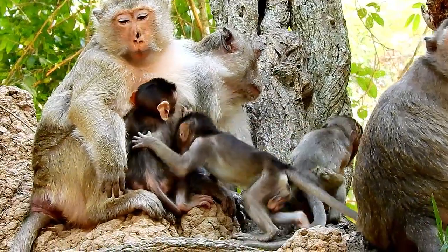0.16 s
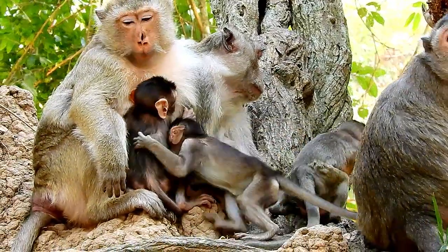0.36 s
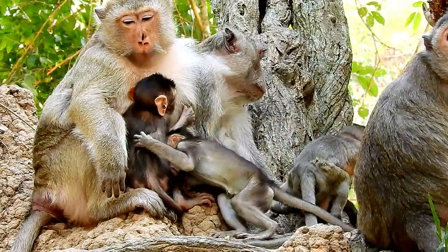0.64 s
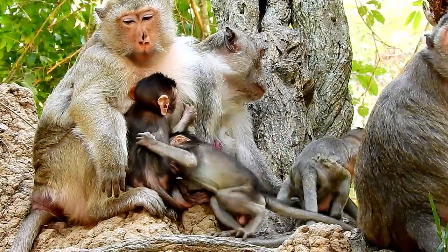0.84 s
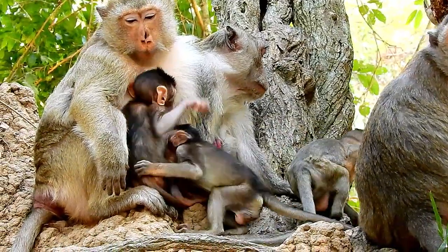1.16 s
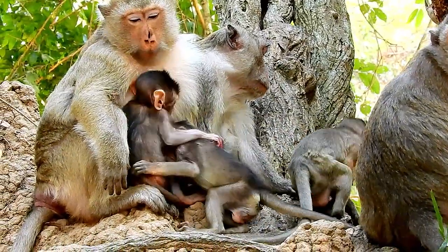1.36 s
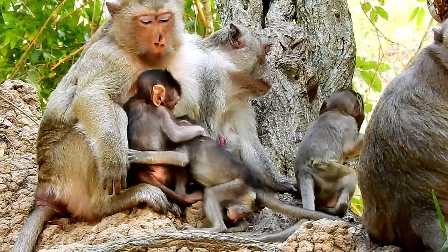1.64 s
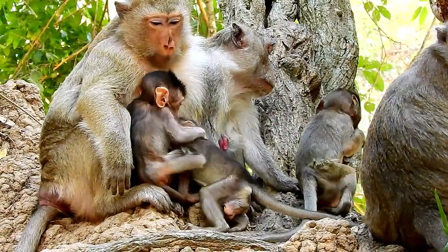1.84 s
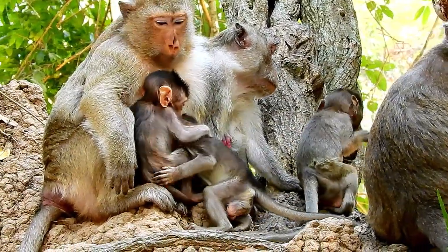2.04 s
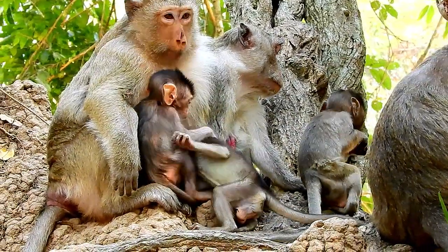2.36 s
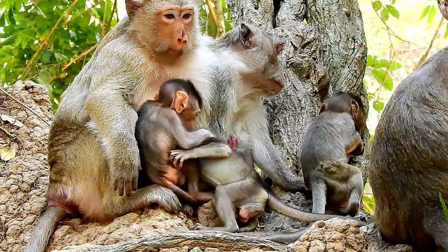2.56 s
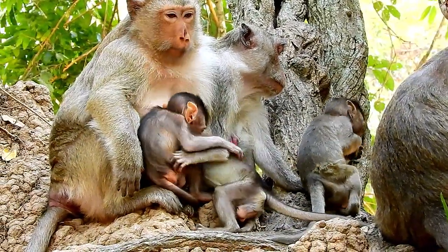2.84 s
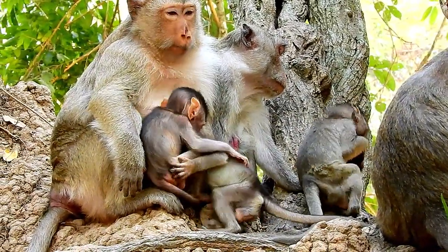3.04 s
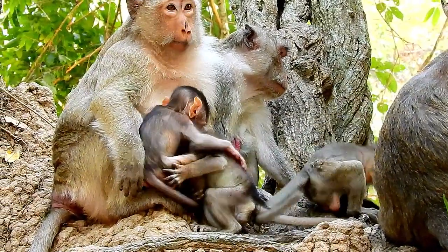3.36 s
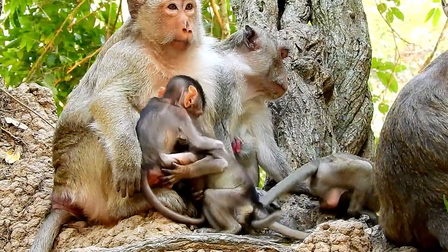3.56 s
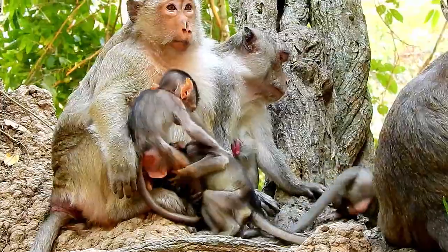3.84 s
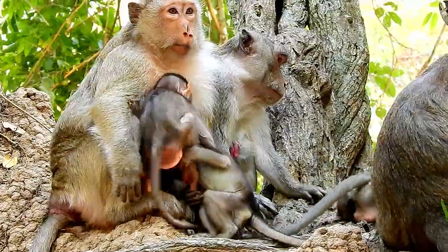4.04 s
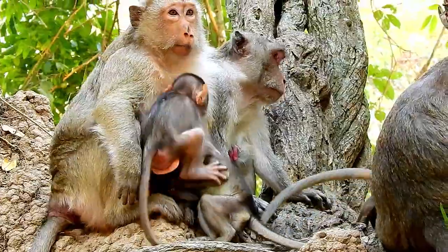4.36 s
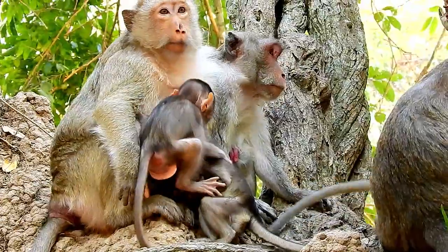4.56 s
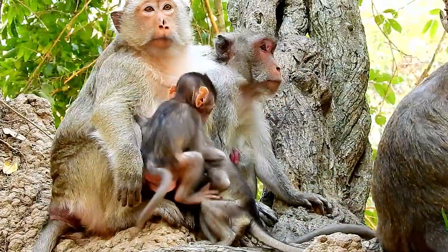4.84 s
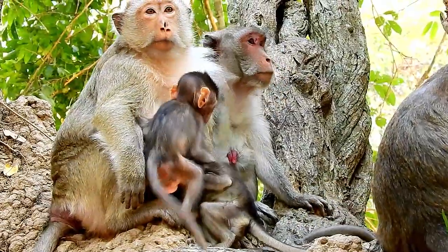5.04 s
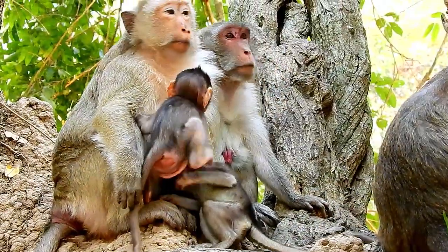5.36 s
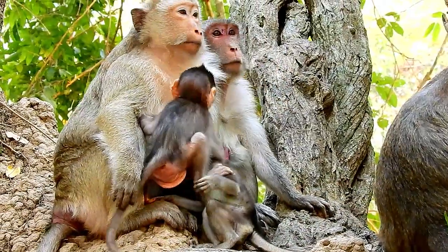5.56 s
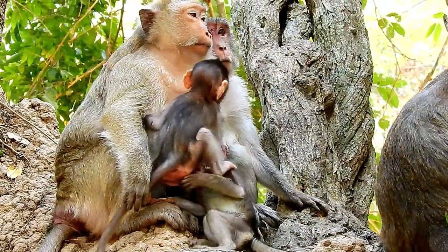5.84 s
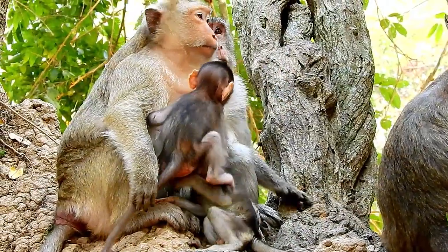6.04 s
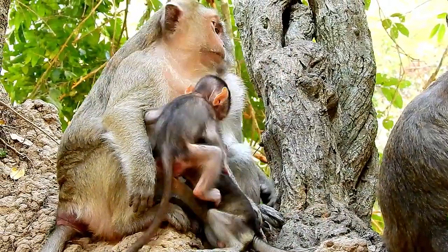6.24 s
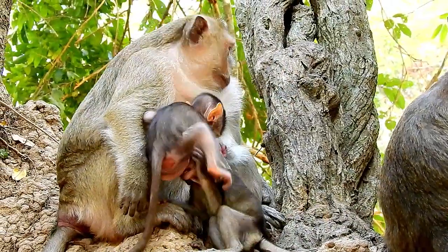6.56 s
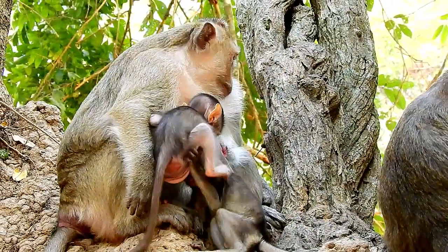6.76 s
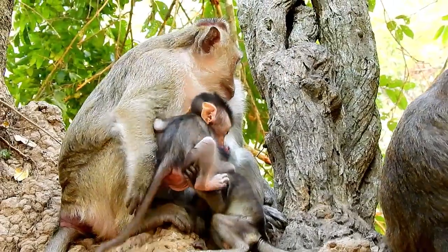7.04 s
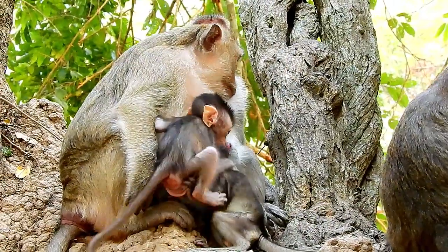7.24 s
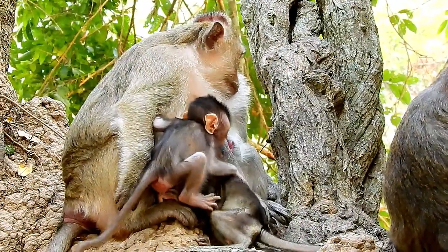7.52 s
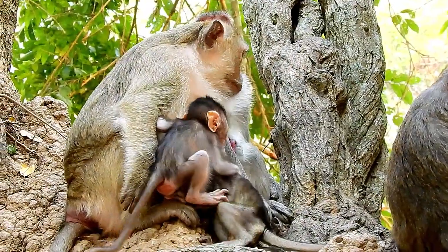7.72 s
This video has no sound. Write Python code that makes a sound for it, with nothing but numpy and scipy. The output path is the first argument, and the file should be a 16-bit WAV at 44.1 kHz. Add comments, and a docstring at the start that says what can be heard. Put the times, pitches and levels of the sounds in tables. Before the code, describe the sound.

Insects chirr steadily in the trees while a breeze rustles leaves, then a small motorbike passes right to left on gritty ground; a thin squeal follows.

```python
"""Insects chirr in the trees around a group of macaques: two fluttering bands of noise.
A slow breeze rustles the leaves (soft noise), with brushes (short swishes); a faint call sounds far off.
A small motorbike passes from right to left: harmonics and puffs of its firings for the exhaust,
roar and hiss noise swept by resonances and an echo, over a plain low rumble, and bursts for stones.
A thin squeal, a wavering sine with a hoarse edge, comes at the end, over a faint outdoor floor."""
import sys
import numpy as np
from scipy import signal
from scipy.fft import rfft, irfft
from scipy.io import wavfile

SR = 44100
rng = np.random.default_rng(int(sys.argv[2]) if len(sys.argv) > 2 else 0)


def transcribe(u):
    """Save the signal u as a 16-bit wav file named by the first command-line argument.

    u: samples, shape (n,) or (channels, n), limited to [-1, 1]; the rate is SR.
    q: integer samples, one column per channel.
    """
    v = np.clip(np.atleast_2d(u).T, -1, 1)
    q = np.round(v * 32767).astype(np.int16)
    wavfile.write(sys.argv[1], SR, q)


N = 347949
NFFT, HOP = 1024, 256
TIME = np.arange(N) / SR
BINS_HZ = np.fft.rfftfreq(NFFT, 1 / SR)
F_HZ = BINS_HZ[:, None]
FRAMES_S = np.arange(N // HOP + 5) * HOP / SR

# Spectra [f/Hz, relative density/dB per Hz]; noise() sets the level
# lower and higher singers
LOW_CHIRR_TONE = [(4700, -53), (5150, -27.5), (5500, -15.5), (5850, -3.5), (6250, 2), (6650, 1.5),
                  (7000, -4), (7500, -26), (8500, -58)]
HIGH_CHIRR_TONE = [(5500, -39.5), (6500, -5), (7050, 1.5), (7650, -0.5), (8150, -7), (8700, -13.5),
                   (9300, -33), (15500, -49)]
# still air and distant traffic
AIR_TONE = [(30, -16), (60, -12), (140, 3.5), (280, -7), (410, -1.5), (480, -19.5), (630, -1.5),
            (860, -13.5), (1250, -8), (2500, -9.5), (3800, -29), (9000, -55)]
# three parts of the rolling sound
RUMBLE_TONE = [(30, -43), (60, -21), (130, 3), (280, -4.5), (360, -6), (450, 0.5), (530, -3.5), (650, 4.5),
               (830, -3), (1000, 2.5), (1250, 0), (2000, -54)]
ROAR_TONE = [(600, -20.5), (880, -19), (1100, -3.5), (1340, -3), (1700, -4), (1920, -2.5), (2250, -2),
             (2750, -13.5), (3600, -72)]
HISS_TONE = [(1700, -9.5), (2800, -2.5), (3200, -2), (3600, 1.5), (3950, -3.5), (4350, 3.5), (5300, 1),
             (6800, -0.5), (8000, -10), (9200, -17), (11000, -21), (15500, -51)]

# likeness of two close microphones in sound from all around [f/Hz, likeness/0-1]
LIKENESS = [(300, 1), (550, 0.99), (1000, 0.89), (2000, 0.72), (4000, 0.75), (6500, 0.12), (9000, 0)]

# chorus swells, before band trims [t/s, lower singers/dB, higher singers/dB, left minus right/dB]
CHORUS_SWELLS = [(0, -53, -55.0, -2), (0.22, -50, -56.5, 2), (0.33, -54, -58.5, 0.5), (0.48, -49.5, -55, 0),
                 (0.66, -51.5, -59, -1), (1.08, -50, -55.5, 0), (1.5, -55.5, -53.5, 0.5),
                 (1.86, -50.5, -56, 0), (2.22, -48, -57, 0.5), (2.38, -54, -56.0, -0.5),
                 (3.24, -52.0, -55.5, 0.5), (4.09, -54, -56.5, 0.5), (4.2, -50, -56, 0.5),
                 (4.9, -51.5, -55, -0.5), (5.15, -52, -54.5, 1.5), (5.65, -49.5, -56.0, -0.5),
                 (6.9, -51.5, -57, 2), (7.6, -50, -57.5, -0.5), (7.88, -55.5, -57, 0.5)]
# phase by which the left microphone leads in the chorus [f/Hz, lead/rad]
CHORUS_LEAD = [(4570, 0.59), (5510, 0.62), (8440, 2.18)]
# flares of the chorus, before the rise and decay [t/s, extra level/dB]
FLARES = [(2.761, 4.5), (3.47, 2.5), (7.531, 3), (7.697, 5.5)]
FLARE_RISE_S, FLARE_DECAY_S = 0.0027, 0.033

RUSTLE_PEAK_S, RUSTLE_SPAN_S = 2.84, 2  # the rustle is strongest around here
CALL_START_S, CALL_LENGTH_S, CALL_HZ, CALL_DB = 1.07, 0.26, 1235, -77.5
# brushes through dry leaves, level before the envelope
# [t/s, level/dB, rise/s, decay/s, centre f/Hz, width/octaves]
BRUSHES = [(1.135, -67.5, 0.021, 0.045, 1560, 0.6), (2.105, -59, 0.0094, 0.1, 6270, 0.54),
           (3.0, -64.5, 0.053, 0.15, 2090, 0.69)]
# swells of the deeper singer [middle t/s, half length/s, level/dB]
DEEP_SWELLS = [(2.272, 0.42, -66.5), (4.4, 0.63, -64.5), (7.162, 0.07, -64)]
DEEP_HZ, DEEP_HALF_WIDTH_HZ = 5500, 480

# engine [t/s, firing rate/Hz]
FIRING = [(0, 29.84), (4.9, 29.25), (6.1, 28.57), (6.7, 27.95), (7.9, 27.5)]
# exhaust partials, before their wavering [multiple of firing rate, relative level/dB]
EXHAUST_NOTE = [(2, -8.5), (4, -10), (5, -1), (6, 3), (7, -7), (8, -13), (10, -6.5), (11, -12.5)]
# straight line at even speed
PASS_S, NEAREST_M, SPEED_M_PER_S = 6.15, 1.893, 8.86
# the pipe points backwards: its swell is later and broader
EXHAUST_LATE_S, EXHAUST_NEAREST_M = 0.12, 2.86
FAR_FROM_S, FAR_DB = 2, -84.5  # the putter's floor level rises to this from far down the road
# in the open between these times, among trees before and after
OPEN_FROM_S, OPEN_UNTIL_S, EDGE_S = 4.9, 6.89, 0.17
# left minus right
COMING_DB, GOING_DB, CROSS_S, CROSS_WIDTH_S = -3.5, 6, 6.466, 0.25
COMING_DELAY_S = 0.00003  # the right microphone hears it first as it comes
# ground under the tyres, rough (+) or smooth (-)
# [middle t/s, half length/s, roar change/dB, hiss change/dB, rumble change/dB]
STRETCHES = [(4.627, 0.091, 5, 0.5, 7), (5.042, 0.26, 7.5, 5, 8.5), (5.513, 0.19, -3, -3, -6.5),
             (5.65, 0.039, -1, 6, 1), (5.783, 0.072, -1.5, 1.5, -12), (5.925, 0.097, 9.5, 11, 6.5),
             (6.062, 0.053, 5, 3, 7), (6.22, 0.1, 6.5, 4.5, 7.5), (6.522, 0.056, -1, -5.5, -11),
             (6.668, 0.04, -6.5, -3, 4), (6.802, 0.17, 11, -0.5, 6.5), (6.971, 0.083, 2.5, -2.5, 10),
             (7.092, 0.046, -1.5, -4, 8.5), (7.223, 0.12, 4, -4, 3), (7.502, 0.13, -0.5, -7.5, 0)]
# first peak of the echo off the ground, and a resonance there [t/s, f/Hz, resonance height/dB]
ECHO_SWEEP = [(4.3, 1320, -1.5), (4.6, 1310, 6), (4.95, 1304, 8.5), (5.4, 1330, 5), (5.7, 1330, -10),
              (5.9, 1350, 3), (6.04, 1360, 11), (6.21, 1540, 2), (6.33, 2030, 4.5), (6.45, 2250, 14),
              (6.54, 2540, 5), (6.62, 1350, 5), (6.78, 1360, 3.5), (7.08, 900, -6), (7.2, 1000, 17),
              (7.27, 1400, 4)]
ECHO_GAIN, ECHO_PEAK_S, ECHO_SPAN_S = 0.4, 6.24, 0.1
# upper resonance of the tyres, a dip where negative [t/s, centre f/Hz, height/dB]
UPPER_SWEEP = [(4.8, 2960, 4), (5.08, 3380, 7), (5.35, 2800, 1), (5.68, 3320, 0), (5.92, 2720, 5),
               (6.02, 2800, 10), (6.08, 3230, 10.5), (6.15, 3230, 2), (6.33, 3200, -3), (6.45, 3640, 9.5),
               (6.65, 3540, 2.5)]
# the finest fizz is thrown forwards and drops once the bike has gone by
FIZZ_HZ, FIZZ_UNTIL_S, FIZZ_FADE_S = 3730, 6.65, 0.17
# stones and bumps, level before envelope and dulling [t/s, level/dB, decay/s, centre f/Hz]
STONES = [(4.87, -62, 0.038, 770), (5.386, -50, 0.0024, 1100), (5.803, -46, 0.013, 2000),
          (6.034, -27, 0.001, 2200), (6.078, -34, 0.0014, 2000), (6.186, -39, 0.012, 1540),
          (6.357, -37.5, 0.0046, 4000), (6.443, -47.5, 0.0068, 3200), (6.588, -53.5, 0.035, 1120)]

# notes of the squeal [start t/s, length/s, pitch f/Hz, whistle level/dB]
SQUEALS = [(7.425, 0.11, 1925, -73.5), (7.516, 0.13, 2015, -68.5), (7.704, 0.07, 1983, -66.5),
           (7.758, 0.17, 1990, -69)]
SQUEAL_RISE_S, SQUEAL_FALL_S = 0.039, 0.05
BAND_LIMIT_HZ = 15700


def gain_of(db):
    """Decibels to gain."""
    return 10 ** (np.asarray(db) / 20)


def evened(x):
    """Scales to an rms of 1."""
    return x / np.sqrt(np.mean(x ** 2) + 1e-20)


def read(points, hz):
    """A curve over frequency, joined on a log-frequency axis."""
    f, value = np.transpose(points)
    return np.interp(np.log(hz + 1), np.log(f + 1), value)


def follow(rows, t=TIME):
    """The columns of a curve at the times t."""
    s, *columns = np.transpose(sorted(rows))
    return [np.interp(t, s, c) for c in columns]


def turned(x, width, t=TIME):
    """A smooth step from 0 to 1 where t passes x."""
    return (1 + np.tanh((t - x) / width)) / 2


def wander(slow_hz, fast_hz, t=TIME):
    """Random drift, rms 1: sines at 24 rates with random phases."""
    rates_hz = np.geomspace(slow_hz, fast_hz, num=24)
    return evened(sum(np.sin(2 * np.pi * (f * t + rng.random())) for f in rates_hz))


def patches(span_s, span_hz):
    """A smooth random field over frequency and time, rms 1."""
    field = rng.standard_normal((len(BINS_HZ), len(FRAMES_S)))
    for axis, (span, step) in enumerate([(span_hz, BINS_HZ[1]), (span_s, FRAMES_S[1])]):
        size = field.shape[axis]
        blur = np.exp(-(np.fft.rfftfreq(size, step) * span) ** 2)
        spectrum = rfft(field, axis=axis) * np.expand_dims(blur, 1 - axis)
        field = irfft(spectrum, size, axis=axis)
    return evened(field)


def noise(colour_db, likeness=None, lead_rad=0):
    """Coloured noise at two close microphones, partly alike; the left leads by lead_rad."""
    a, b, c, d = rng.standard_normal((4, len(BINS_HZ), len(FRAMES_S)))
    same = np.clip(read(LIKENESS, F_HZ) if likeness is None else likeness, -1, 1)
    left = a + 1j * b
    right = same * left + np.sqrt(1 - same ** 2) * (c + 1j * d)
    right = right * np.exp(-1j * lead_rad)
    spectra = np.array([left, right]) * gain_of(colour_db)
    pair = signal.istft(spectra, nperseg=NFFT, noverlap=NFFT - HOP)[1][:, :N]
    return pair / np.std(pair.mean(0))


def tone(points):
    """A spectrum as a column of dB, falling a further 20 dB per octave beyond its ends."""
    hz = BINS_HZ + 1
    octaves_out = abs(np.log2(hz / np.clip(hz, points[0][0], points[-1][0])))
    return (read(points, BINS_HZ) - 20 * octaves_out)[:, None]


def placed(x, balance_db):
    """Leans a sound left (+) or right (-), keeping the mean of the two gains."""
    sides = gain_of(np.array([balance_db, -balance_db]).reshape(2, -1) / 2)
    return x * sides / sides.mean(0)


def add(mix, s, sound):
    """Mixes a sound in at a time."""
    part = mix[:, round(s * SR):][:, :sound.shape[1]]
    part += sound[:, :part.shape[1]]


def burst(db, rise_s, decay_s, hz, octaves):
    """A swish of noise around one frequency that rises quickly and dies away."""
    age_s = np.arange(SR) / SR
    bins_hz = np.fft.rfftfreq(SR, 1 / SR)
    left, other = rfft(rng.standard_normal((2, SR)))
    same = np.clip(read(LIKENESS, bins_hz), -1, 1)
    right = same * left + np.sqrt(1 - same ** 2) * other
    colour = (1 + (np.log2((bins_hz + 1) / hz) / octaves) ** 2 / 2) ** -2
    pair = irfft(np.array([left, right]) * colour, SR)
    envelope = (1 - np.exp(-age_s / rise_s)) * np.exp(-age_s / decay_s)
    return pair / np.std(pair.mean(0)) * gain_of(db) * envelope


def insects(side_db=0.5, patchy_db=1.5, rasp_db=0.5, flutter_db=0.86, low_db=-0.5, high_db=1.57):
    """Countless overlapping buzzes merge into two noise bands, each fluttering on its own."""
    lower_db, higher_db, balance_db = follow(CHORUS_SWELLS)
    flare_db = sum(db * turned(s, FLARE_RISE_S) * np.exp(-abs(TIME - s) / FLARE_DECAY_S)
                   for s, db in FLARES)
    lead_rad = read(CHORUS_LEAD, F_HZ)
    bands = [(LOW_CHIRR_TONE, lower_db + low_db), (HIGH_CHIRR_TONE, higher_db + high_db)]
    out = 0
    for colour, level_db in bands:
        colour_db = tone(colour) + patchy_db * patches(span_s=0.09, span_hz=680)
        band = noise(colour_db, likeness=0.4, lead_rad=lead_rad)
        flutter = flutter_db * wander(slow_hz=3.2, fast_hz=26.9)
        out += band * gain_of(level_db + flare_db + flutter)
    sides_db = side_db * np.array([wander(slow_hz=5.3, fast_hz=7.9) for side in range(2)])
    rasp = rasp_db * wander(slow_hz=30.8, fast_hz=216.0)
    return placed(out, balance_db) * gain_of(sides_db + rasp)


def air(level_db=-77.5, patchy_db=2.5):
    """Still air and distant traffic: a faint, drifting noise floor."""
    return gain_of(level_db) * noise(tone(AIR_TONE) + patchy_db * patches(span_s=0.064, span_hz=315))


def rustle(level_db=-78, uneven_db=3.0, patchy_db=3.0):
    """A slow breeze rustles the leaves: soft, unbroken, uneven noise."""
    colour_db = tone([(800, -9.5), (1800, -2.5), (2600, -2.5), (3600, -16.5)])
    foliage = noise(colour_db + patchy_db * patches(span_s=0.1, span_hz=910))
    swell = np.exp(-((TIME - RUSTLE_PEAK_S) / RUSTLE_SPAN_S) ** 2)
    return foliage * gain_of(level_db + uneven_db * wander(slow_hz=3, fast_hz=16)) * swell


def far_call(half_width_hz=60):
    """A faint, hoarse call far off: narrow noise at one pitch under an arch."""
    arch = np.sqrt(abs(np.sin(np.pi * np.clip((TIME - CALL_START_S) / CALL_LENGTH_S, 0, 1))))
    colour_db = -20 * np.log10(1 + ((F_HZ - CALL_HZ) / half_width_hz) ** 2)
    return gain_of(CALL_DB) * arch * noise(colour_db)


def leaves(crackle_db=1.0):
    """Each brush is a quick, grainy swish of noise that dies away."""
    out = np.zeros((2, N))
    for s, *shape in BRUSHES:
        add(out, s, burst(*shape))
    return out * gain_of(crackle_db * wander(slow_hz=27.8, fast_hz=302))


def deep_singer():
    """One deeper insect joins in for a few swells: a narrow band of noise."""
    level = sum(gain_of(db) * np.exp(-((TIME - s) / half_s) ** 2) for s, half_s, db in DEEP_SWELLS)
    colour_db = -20 * np.log10(1 + ((F_HZ - DEEP_HZ) / DEEP_HALF_WIDTH_HZ) ** 4)
    return noise(colour_db, likeness=0.5) * level


def passing(top_db, spread_db, absorb_db_per_m, screen_db, late_s=0, nearest_m=NEAREST_M):
    """Level/dB: falls spread_db per tenfold distance, absorb_db_per_m, and screen_db among trees."""
    metres = np.hypot(nearest_m, SPEED_M_PER_S * (TIME - PASS_S - late_s))
    in_open = turned(OPEN_FROM_S, EDGE_S) - turned(OPEN_UNTIL_S, EDGE_S)
    spread = spread_db * np.log10(metres / nearest_m)
    # a negative screen_db makes the part louder outside the open stretch
    return top_db - spread - absorb_db_per_m * metres - screen_db * (1 - in_open)


def exhaust(turns, unsteady=0.12, scatter_rad=0.22, puff_db=-9, lag_rad=0.044, waver_db=1,
            bark_ahead_db=-4, bark_behind_db=1, bark_waver_db=3):
    """One cylinder: each firing rings the silencer (partials) and puffs out gas (pulsed noise)."""
    level_db = passing(top_db=-52.5, spread_db=16.0, absorb_db_per_m=0.53, screen_db=10.0,
                       late_s=EXHAUST_LATE_S, nearest_m=EXHAUST_NEAREST_M)
    level_db = np.maximum(level_db, FAR_DB - 10 * (1 - turned(FAR_FROM_S, EDGE_S)))
    # the top partials come and go, and are strongest once the pipe faces the listener
    facing = turned(PASS_S, 0.081, FRAMES_S)
    bark_db = bark_ahead_db + (bark_behind_db - bark_ahead_db) * facing
    bark_db = bark_db + bark_waver_db * wander(1.4, 6, FRAMES_S)
    note = 0
    for k, db in EXHAUST_NOTE:
        # the pipe delays the upper partials; scattering makes each waver
        scatter = scatter_rad * np.interp(TIME, FRAMES_S, wander(1.6, 24, FRAMES_S))
        phase = 2 * np.pi * k * turns - lag_rad * k ** 2 + scatter
        drift_db = waver_db * wander(1.1, 5, FRAMES_S) + bark_db * (k >= 10)
        note += gain_of(db + np.interp(TIME, FRAMES_S, drift_db)) * np.cos(phase)
    note = evened(note) * (1 + unsteady * wander(slow_hz=3, fast_hz=18))
    gas = noise(tone([(35, -43), (70, -17), (160, -1.5), (230, 4), (320, -4.5), (500, -3.0), (1000, -26)]))
    puffs = gas * evened(3.2 + np.cos(2 * np.pi * turns))
    return gain_of(level_db) * (note + gain_of(puff_db) * puffs)


def rough_ground():
    """Change in roar, hiss and rumble (dB) as the tyres cross each stretch."""
    return sum(np.outer(extra_db, np.exp(-((TIME - s) / half_s) ** 2))
               for s, half_s, *extra_db in STRETCHES)


def ring(rows, octaves, flank=0.1):
    """A moving resonance with darker flanks, as dB over frequency and time."""
    hz, height_db = follow(rows, FRAMES_S)
    away = np.log2((F_HZ + 1) / hz) / octaves
    return height_db * ((1 + flank) * np.exp(-away ** 2) - flank * np.exp(-(away / 2) ** 2 / 2))


def ground_echo():
    """Comb/dB of a delayed copy whose first peak sweeps, strongest just after the pass."""
    peak_hz = follow(ECHO_SWEEP, FRAMES_S)[0]
    echo = ECHO_GAIN / (1 + ((FRAMES_S - ECHO_PEAK_S) / ECHO_SPAN_S) ** 2)
    return 20 * np.log10(abs(1 + echo * np.exp(-2j * np.pi * F_HZ / peak_hz)))


def grit(per_s=150, size=0.4, decay_s=0.0017):
    """Gain of a scratchy roll: each grain under the tyres makes it leap for an instant."""
    grains = size * rng.exponential(1, N) * (rng.random(N) < per_s / SR)
    leaps = signal.lfilter([1], [1, -np.exp(-1 / (decay_s * SR))], np.tanh(grains))
    return evened(1 + leaps)


def rolling(turns, fine_db=3.0, grain_db=1.56, clatter=0.023, fizz_lean=0.082,
            roar_rear_db=-7.0, hiss_rear_db=-3, fizz_ahead_db=1.0, fizz_behind_db=-6):
    """Tyres and chassis: roar and hiss noise swept by resonances and an echo, over a plain low rumble."""
    behind = turned(CROSS_S, CROSS_WIDTH_S)  # 0 coming, 1 going away
    balance_db = COMING_DB + (GOING_DB - COMING_DB) * behind
    roar_db, hiss_db, rumble_db = rough_ground()
    roar_db = roar_db + roar_rear_db * behind + passing(
        top_db=-48.5, spread_db=21.0, absorb_db_per_m=0.44, screen_db=-2.0)
    hiss_db = hiss_db + hiss_rear_db * behind + passing(
        top_db=-45.5, spread_db=20.0, absorb_db_per_m=0.4, screen_db=-4.0)
    rumble_db = rumble_db + passing(
        top_db=-56.0, spread_db=21.5, absorb_db_per_m=0.05, screen_db=3.5)
    comb_db = ground_echo()
    # the tread sings in brief narrow streaks, and grit roughens it
    streaks_db = fine_db * patches(span_s=0.082, span_hz=61.3)
    field_db = streaks_db + grain_db * patches(span_s=0.028, span_hz=623)
    fizz_gone = turned(FIZZ_UNTIL_S, FIZZ_FADE_S, FRAMES_S)
    fizz_db = fizz_ahead_db + (fizz_behind_db - fizz_ahead_db) * fizz_gone
    fizz_db = fizz_db * turned(FIZZ_HZ, 200, F_HZ)
    coming = 1 - np.interp(FRAMES_S, TIME, behind)
    lead_rad = -2 * np.pi * F_HZ * COMING_DELAY_S * coming

    roar_colour_db = tone(ROAR_TONE) + field_db + comb_db + ring(ECHO_SWEEP, octaves=0.12)
    roar = noise(roar_colour_db, lead_rad=lead_rad) * gain_of(roar_db)
    # rough ground scatters the treble, so its comb is shallower
    hiss_colour_db = tone(HISS_TONE) + field_db + 0.49 * comb_db
    hiss_colour_db = hiss_colour_db + ring(UPPER_SWEEP, octaves=0.24) + fizz_db
    hiss = noise(hiss_colour_db, lead_rad=lead_rad) * gain_of(hiss_db)
    hiss_body = signal.sosfiltfilt(signal.butter(4, FIZZ_HZ, fs=SR, output="sos"), hiss)
    fizz = hiss - hiss_body
    rumble = noise(tone(RUMBLE_TONE) + 0.92 * field_db) * gain_of(rumble_db)
    beat = 1 + clatter * np.cos(2 * np.pi * turns)  # the frame shakes with each firing
    out = placed(roar + hiss_body, balance_db) + placed(fizz, fizz_lean * balance_db) + rumble
    return out * beat * grit()


def stones(rise_s=0.00065, octaves=0.55, dull_hz=7000):
    """Grit snaps under the tyres and bumps knock the frame: low-passed bursts of noise."""
    out = np.zeros((2, N))
    for s, db, decay_s, hz in STONES:
        add(out, s, burst(db, rise_s, decay_s, hz, octaves))
    return signal.sosfilt(signal.butter(2, dull_hz, fs=SR, output="sos"), out)


def motorbike():
    """Exhaust, rolling and stones; the firing rate sinks a little through the pass."""
    turns = np.cumsum(follow(FIRING)[0]) / SR  # firings so far
    return exhaust(turns) + rolling(turns) + stones()


def squeal(jitter=0.0059, rasp_db=-1, balance_db=7, waver_db=2):
    """A thin, wavering whistle (jittered sine) with a hoarse noise edge, swelling in short notes."""
    hz, = follow([(s + length_s / 2, pitch_hz) for s, length_s, pitch_hz, db in SQUEALS])
    level = 0
    for s, length_s, pitch_hz, db in SQUEALS:
        rise = (TIME - s) / SQUEAL_RISE_S
        fall = (s + length_s - TIME) / SQUEAL_FALL_S
        level = level + gain_of(db) * np.clip(np.minimum(rise, fall), 0, 1)
    turns = np.cumsum(hz * (1 + jitter * wander(slow_hz=18, fast_hz=159))) / SR
    waver = gain_of(waver_db * wander(slow_hz=15, fast_hz=71.4))
    whistle = evened(np.sin(2 * np.pi * turns) * waver)
    rasp = noise(tone([(1000, -57), (1650, 2.0), (2050, -2), (2500, -7),
                       (3350, -3), (4200, -20), (7000, -56.5)]))
    return placed((whistle + gain_of(rasp_db) * rasp) * level, balance_db)


def scene():
    """All sources at the two microphones."""
    return insects() + air() + rustle() + far_call() + leaves() + deep_singer() + motorbike() + squeal()


def record(dry):
    """The recorder's band limit: a linear-phase low-pass."""
    lowpass = signal.firwin(511, BAND_LIMIT_HZ, window=("kaiser", 9), fs=SR)
    return signal.oaconvolve(dry, lowpass[None], "same")


dry = scene()
out = record(dry)
transcribe(out)
```